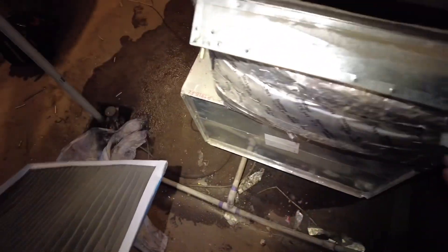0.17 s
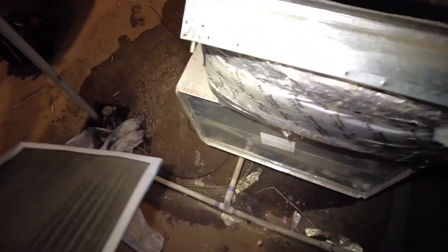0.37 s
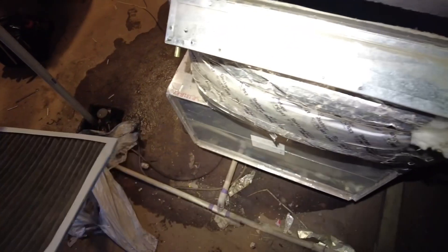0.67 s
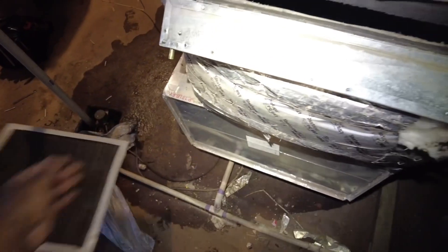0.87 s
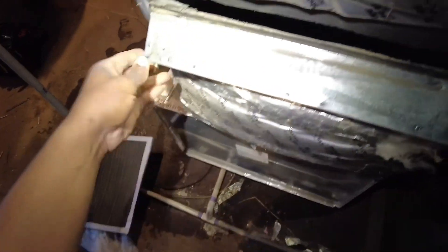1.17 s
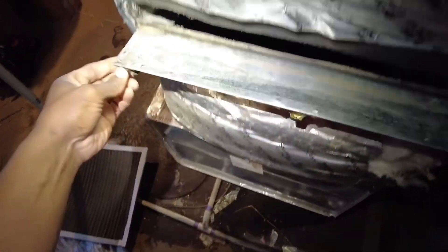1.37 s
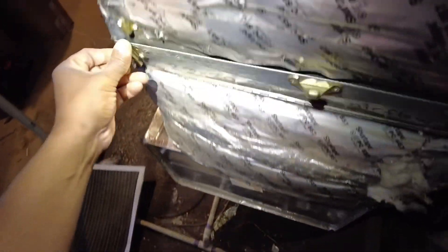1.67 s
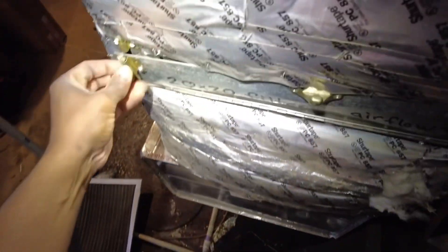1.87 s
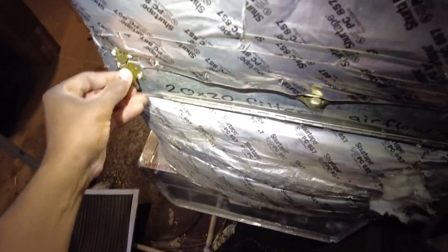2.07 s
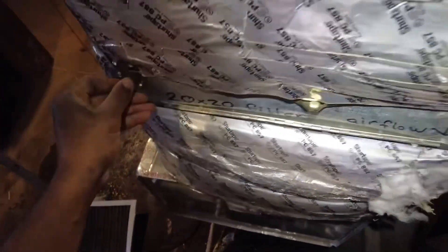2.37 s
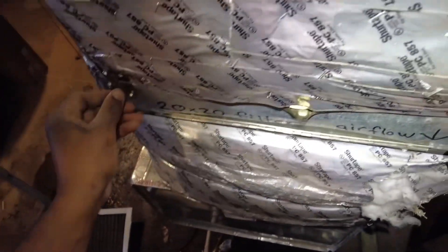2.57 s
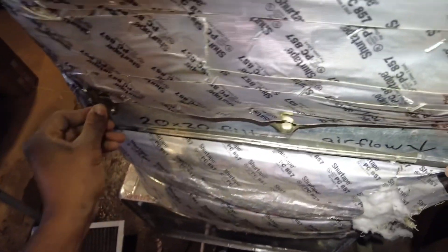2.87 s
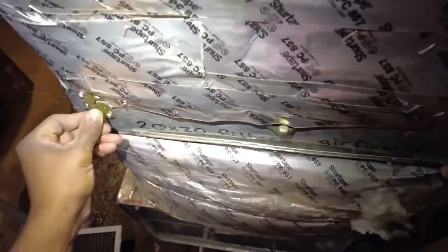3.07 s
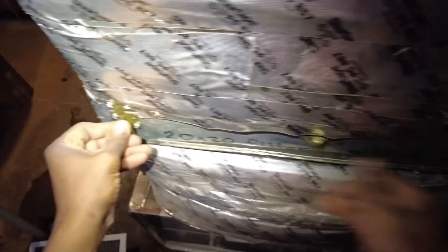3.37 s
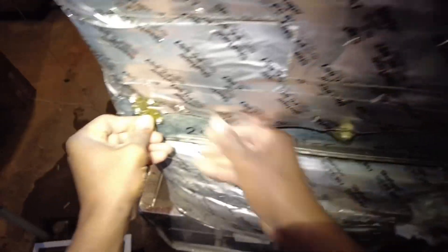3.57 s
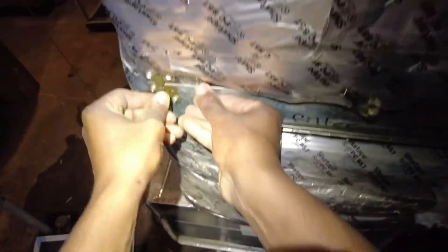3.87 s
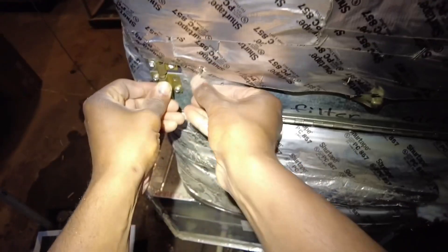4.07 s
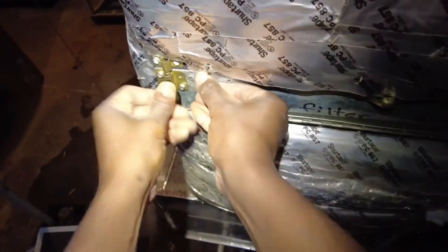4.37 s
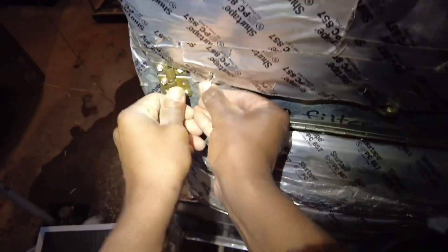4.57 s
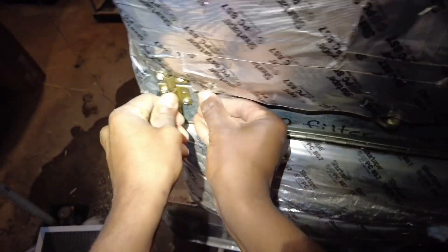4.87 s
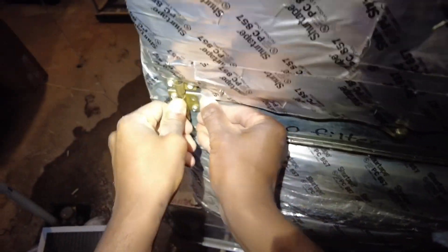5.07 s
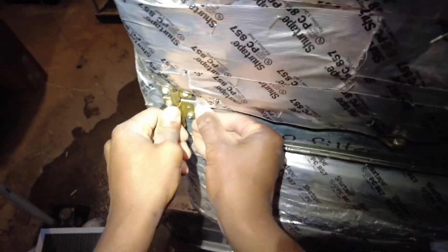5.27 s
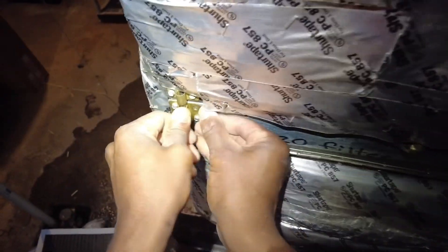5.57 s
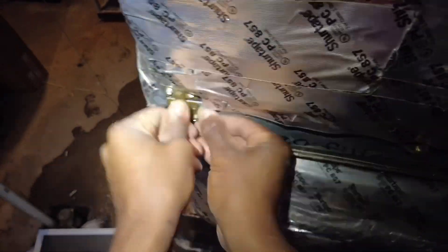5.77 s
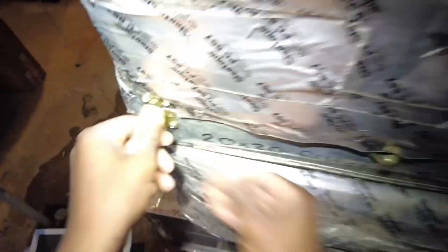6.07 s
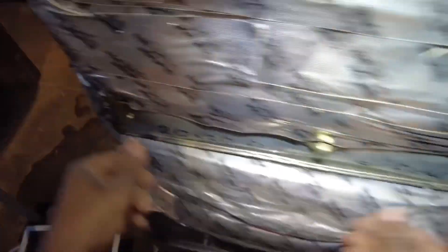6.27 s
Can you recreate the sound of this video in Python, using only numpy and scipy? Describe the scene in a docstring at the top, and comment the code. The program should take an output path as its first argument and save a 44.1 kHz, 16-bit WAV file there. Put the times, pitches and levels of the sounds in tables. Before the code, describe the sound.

An air handler's blower rumbles steadily in a small room while air rushes and faintly whines at an open filter slot. A sheet-metal cover knocks and scrapes home in three shoves, and the rush narrows to a hiss and stops. Close to the microphone, hands rub over foil tape and work a brass latch, which ticks and squeaks once. The panel thumps twice, then the latch snaps shut on a third thump.

```python
"""An air handler's blower rumbles in its ducts in a small room; air rushes and whines at the open filter slot.
A sheet-metal cover knocks against its frame and scrapes home in three shoves. The rush dies, and air
hisses through the last gap until that seals too. Hands rub over crinkling foil tape and work a brass
latch: it ticks, squeaks once and makes the panel thump twice, then snaps shut on a third thump,
leaving the foil shivering. The blower runs on."""
import sys
import numpy as np
from scipy import signal
from scipy.fft import rfft, irfft, next_fast_len
from scipy.io import wavfile
from scipy.ndimage import uniform_filter1d, map_coordinates

SR = 44100
rng = np.random.default_rng(int(sys.argv[2]) if len(sys.argv) > 2 else 0)


def digitize_waveform(pressure):
    """Quantize a signal to 16-bit integers and store it at the path in sys.argv[1].

    Rows of a 2-D input are taken as channels; values are limited to [-1, 1].
    """
    field = np.atleast_2d(pressure).T
    bounded = np.clip(field, -1, 1)
    quanta = np.round(bounded * 32767).astype(np.int16)
    wavfile.write(sys.argv[1], SR, quanta)


N = 282681
TIME = np.arange(N) / SR
HIT_TIME = np.arange(SR // 4) / SR
SLOT_SHUT_S, SLOT_FALL_DB_PER_S = 1.79, 150  # the cover passes over the open slot

# the panel giving way: start_s, peak_db, low_mode_lift_db
PANEL_THUMPS = [(4.599, -13.5, 11), (4.9339, -8.5, 1.5), (5.813, -18.5, 6.5)]
# tone colour of light contacts on tab and foil: frequency_hz, gain_db
TICK_COLOUR = [(150, -7), (500, 4.5), (1000, 2), (2700, -5), (5000, -3.5), (9000, -6.5), (16000, -17)]


def cover():
    """The sheet hisses along the foil, grates where its edge bites and knocks against the frame."""
    # pushes that drive the cover home: start_s, end_s, hiss_db, grit_db
    shoves = [(1.122, 1.185, -38, -51), (1.295, 1.35, -48, -41), (1.497, 1.592, -58, -47.5)]
    # the cover hitting its frame: start_s, level_db, hardness_db, spot_hz, spot_lift_db
    knocks = [(0.5168, -43.5, -19.5, 3140, 5), (0.5939, -41.5, -21, 1560, 15), (0.619, -44, -8.5, 6240, 7),
              (0.7961, -40, -15.5, 1590, 11), (0.8607, -36.5, -7.5, 6060, 4.5),
              (0.9383, -33.5, -7.5, 1790, 7.5), (1.1184, -31.5, -18, 3400, 12), (1.177, -29, -4, 3000, 11),
              (1.331, -37.5, -9, 1510, 7), (1.3457, -37.5, -7, 5750, 13), (1.3656, -32.5, -1, 4350, 4),
              (1.417, -37.5, 0, 6200, 3), (1.4511, -40.5, 7, 7360, 5), (1.5292, -29, -2, 1480, 6),
              (1.5342, -24.5, 1.5, 2710, 8), (1.542, -34.5, -6, 9200, 14), (1.5822, -30.5, -5, 1800, 2),
              (1.605, -37, -3, 2860, 7), (1.721, -32.5, -4, 4005, 6), (1.739, -34.5, -6, 2980, 5),
              (1.936, -44, -9, 4350, 5)]
    # tone colours of the slide, the biting edge and the knocks: frequency_hz, gain_db
    scrape_colour = [(500, -1.5), (1300, -7), (2500, -6.5), (6000, -8.5), (11000, -13), (16000, -15.5)]
    grit_colour = [(150, -6), (280, 16.5), (700, -2), (1050, -4), (1500, 4.5), (2200, -3), (3000, -3),
                   (6000, -8), (9000, -23), (16000, -35)]
    knock_colour = [(120, -26.5), (200, -1), (700, -17), (1450, -17.5), (4300, -16.5), (6300, -15.5),
                    (9060, -20), (11700, -23), (16000, -31)]
    # resonances and nulls of the sheet, and resonances of its edge: centre_hz, width_hz, gain_db
    sheet_modes = [(1070, 320, -11), (1470, 160, 9.5), (1780, 120, 4), (2240, 96, 7), (2400, 130, -4.5),
                   (2940, 250, 5.5), (4340, 480, 8), (6050, 400, 5)]
    edge_modes = [(1480, 140, 5), (2980, 380, 3), (5540, 800, 9)]

    push = lambda start, end: held(start, end, rise_db_per_s=750, fall_db_per_s=329)
    sliding = amp(-53) * push(shoves[0][0], shoves[-1][1])  # light contact from first shove to last
    hissing = sum(amp(db) * push(start, end) for start, end, db, _ in shoves)
    grating = sum(amp(db) * push(start, end) for start, end, _, db in shoves)
    judder = amp(1.2 * wobble(90) + 1.8 * wobble(600))
    friction = rush(lambda hz: along(scrape_colour, hz) + .5 * bumps(sheet_modes, hz))
    slide = np.hypot(sliding, hissing) * unit(judder * friction)
    catches = np.array([slips(per_s=500), slips(per_s=400)])
    grit = spread(catches, lambda hz: along(grit_colour, hz) + bumps(edge_modes, hz))
    ring_s = lambda db: 0.037 * 2 ** ((db + 30) / 37)  # heavier knocks shake the sheet for longer
    blows = [(s, db, hard_db, ring_s(db), spot(hz, lift_db)) for s, db, hard_db, hz, lift_db in knocks]
    # the floppy sheet seats over a few milliseconds
    clatter = contacts(blows, lambda hz: along(knock_colour, hz) + bumps(sheet_modes, hz),
                       rise_s=.0022, width=0.82, low_db=-2.5, thud=0.33)
    return slide + grating * unit(grit) + clatter


def snap():
    """The latch snaps shut with its whole body and leaves the foil shivering in a dense, noisy tail."""
    # the latch closing: start_s, level_db, hardness_db, t60_s
    closing = [(5.814, -16.5, 3.5, 0.014)]
    # tone colours of the latch and the shivering foil: frequency_hz, gain_db
    latch_colour = [(150, -17), (400, -16), (800, -24.5), (2000, -29), (4000, -20), (9000, -18),
                    (16000, -22.5)]
    foil_colour = [(150, -20), (520, 3), (950, -18.5), (1540, -12), (2200, -18), (2800, -9), (5000, -19),
                   (5950, -8), (7500, -16), (10500, -22), (16000, -25)]
    # broad resonances and nulls of the latch: centre_hz, width_hz, gain_db
    latch_modes = [(1060, 350, -4), (1560, 460, 26), (2460, 270, 8.5), (2930, 600, 12.5),
                   (4450, 1100, 12.5), (6040, 450, 10), (10600, 680, 5), (12200, 1100, 0)]
    foil_db, foil_hardness_db, foil_t60_s = -12.5, -2, 0.08  # level relative to the snap
    blows = [(s, db, hard_db, t60, []) for s, db, hard_db, t60 in closing]
    shivers = [(s, db + foil_db, foil_hardness_db, foil_t60_s, []) for s, db, _, _ in closing]
    crack = contacts(blows, lambda hz: along(latch_colour, hz) + bumps(latch_modes, hz),
                     rise_s=0.00044, width=0.72, low_db=-1.5)
    return crack + contacts(shivers, lambda hz: along(foil_colour, hz), rise_s=0.0036, width=1.0)


def panel():
    """The taped panel gives under the thumbs with a damped low thump."""
    # tone colour of a thump: frequency_hz, gain_db
    thump_colour = [(60, -33), (130, -13.5), (180, -3), (250, 2.5), (320, -6), (400, -4.5), (480, -13),
                    (570, -13.5), (730, -38.5), (1500, -41), (2500, -59), (8000, -78)]
    mode_hz, mode_width_hz = 255, 105  # the panel's lowest mode
    track = np.zeros((2, N))
    push = signal.unit_impulse(len(HIT_TIME))[None]
    for s, db, lift_db in PANEL_THUMPS:
        low_mode = [(mode_hz, mode_width_hz, lift_db)]
        thump = causal(push, lambda hz: along(thump_colour, hz) + bumps(low_mode, hz), size=8192)
        add(track, s, amp(db) * thump / np.abs(thump).max())
    return track


def latch():
    """The brass tab ticks under the fingers and rattles when the panel thumps."""
    # touches on the tab: start_s, level_db, hardness_db, spot_hz, spot_lift_db
    clicks = [(2.173, -46.5, -4, 1700, 6), (2.7848, -49.5, -9, 2885, 3), (3.0682, -35, -22, 2590, 8),
              (3.1498, -44, -25, 2660, 13), (3.175, -51, -17, 1870, 24), (3.1987, -39.5, -1.5, 7400, 4.5),
              (4.3927, -44, -7, 4160, 10), (4.4712, -41.5, 1, 3600, 5), (4.612, -44, -3, 4310, 6),
              (4.6385, -40.5, -25, 2350, 16), (4.6944, -52, 5, 10900, 16), (4.7218, -31, -9.5, 535, 4),
              (5.466, -48, -12, 2800, 6), (6.205, -46, -17, 1380, 5)]
    # resonances and nulls of the tab: centre_hz, width_hz, gain_db
    tab_modes = [(800, 260, -8.5), (1230, 230, 2), (1660, 270, 4), (2160, 680, -3), (2830, 350, 7.5),
                 (3630, 300, 0), (10600, 900, 1)]
    rattle_db, rattle_hardness_db, rattle_t60_s = -30, -10, 0.08  # level relative to the thump
    ring_s = lambda hard_db: 0.037 * 2 ** (hard_db / 8)  # a finger dulls and damps the tab together
    ticks = [(s, db, hard_db, ring_s(hard_db), spot(hz, lift_db))
             for s, db, hard_db, hz, lift_db in clicks]
    rattles = [(s, db + rattle_db, rattle_hardness_db, rattle_t60_s, []) for s, db, _ in PANEL_THUMPS]
    return contacts(ticks + rattles, lambda hz: along(TICK_COLOUR, hz) + bumps(tab_modes, hz),
                    rise_s=0.00056, width=0.68, thud=0.55)


def squeak():
    """The brass tab slips once with a falling stick-slip tone; overtones and rasp grow with pressure."""
    # harmonics at full pressure, from the fundamental up: gain_db
    harmonics = [2, -7, -20, -22]
    start_s, end_s = 4.453, 4.465
    pitch_hz, sag_hz_per_s, jitter_share = 3620, 9000, .026
    glide_hz = np.clip(pitch_hz - sag_hz_per_s * (TIME - start_s), pitch_hz / 2, 2 * pitch_hz)
    phase = 2 * np.pi * np.cumsum(glide_hz * (1 + jitter_share * wobble(2500))) / SR
    pressure = held(start_s, end_s, rise_db_per_s=1600, fall_db_per_s=3000)
    tone = sum(amp(db) * pressure ** np.sqrt(k) * np.sin(k * phase) for k, db in enumerate(harmonics, 1))
    chatter = amp(2.1 * wobble(900))
    rasp = amp(-5.5) * pressure ** 2 * rush(lambda hz: along(TICK_COLOUR, hz))
    return amp(-37.5) * chatter * (np.sqrt(2) * tone + rasp)


def hands():
    """Hands rub over foil tape and latch; each stroke swells and fades with a fine grain."""
    # strokes: start_s, length_s, level_db
    rubs = [(2.036, 0.5, -67.5), (2.956, 0.11, -65), (3.555, 0.33, -59.5), (4.23, 0.16, -63.5),
            (4.923, 0.093, -57.5), (5.778, 0.067, -48)]
    # tone colour of the rubbing: frequency_hz, gain_db
    rub_colour = [(600, -9), (1400, -0.5), (4300, -3), (8000, -4.5), (13000, -12), (16000, -17)]
    strokes = sum(amp(db) * np.sin(np.pi * np.clip((TIME - s) / length, 0, 1)) for s, length, db in rubs)
    grain = amp(wobble(40) + 2 * wobble(400))
    return strokes * unit(grain * rush(lambda hz: along(rub_colour, hz)))


def crinkles():
    """The foil tape gives faint ticks at random while the fingers feel for the latch."""
    start_s, length_s, ticks_per_s = 2.25, 0.55, 7
    loudest_db, hardness_db, t60_s = -54, -8, .018
    draws = rng.random((round(length_s * ticks_per_s), 3))
    ticks = [(start_s + when * length_s, loudest_db - 5 * weak, hardness_db, t60_s,
              spot(hz=1500 * 4 ** pitch, lift_db=10)) for when, weak, pitch in draws]
    return contacts(ticks, lambda hz: along(TICK_COLOUR, hz), rise_s=0.00039, width=1.0)


def suction():
    """Air rushes into the open slot, then hisses higher through the last gap until that seals."""
    # tone colour of the flow into the open slot: frequency_hz, gain_db
    slot_colour = [(160, -53), (280, -14), (326, -4), (361, -32), (393, -20), (465, 2), (664, -6.5),
                   (800, -12), (980, -11), (1740, -13.5), (3860, -24.5), (4350, -22), (16000, -42.5)]
    # resonances of the open slot: centre_hz, width_hz, gain_db
    slot_modes = [(710, 100, -4), (874, 170, 6.5), (1288, 45, 9.5), (1650, 450, 4.5), (3200, 300, 5),
                  (4220, 420, 7)]
    # resonances of the last narrow gap: centre_hz, half_width_hz, gain_db
    gap_modes = [(1340, 90, -1), (1820, 200, 6.5), (2940, 200, 6), (4170, 260, -3)]
    sealed_s = 1.92
    slot = rush(lambda hz: along(slot_colour, hz) + bumps(slot_modes, hz))
    gap_gain = lambda hz: sum(amp(db) / (1 + ((hz - centre) / half_width) ** 2)
                              for centre, half_width, db in gap_modes)
    gap = rush(lambda hz: 20 * np.log10(gap_gain(hz)))
    wide_open = amp(-51.5) * held(0, SLOT_SHUT_S, 0, SLOT_FALL_DB_PER_S)
    narrowing = amp(-49.5) * held(SLOT_SHUT_S, sealed_s, rise_db_per_s=100, fall_db_per_s=120)
    unrest = amp(.8 * wobble(11.67))
    return unrest * (wide_open * slot + narrowing * gap)


def whine():
    """The blower's wavering tones escape while the slot is open."""
    # blower tones: pitch_hz, level_db
    partials = [(465, -64), (803, -65)]
    waver_hz, flutter_db = 6.5, 4
    tone = lambda hz: np.sin(2 * np.pi * np.cumsum(hz + waver_hz * wobble(30.02)) / SR)
    tones = sum(amp(db) * unit(amp(flutter_db * wobble(12.04)) * tone(hz)) for hz, db in partials)
    return tones * held(0, SLOT_SHUT_S, 0, SLOT_FALL_DB_PER_S)


def blower():
    """Fan turbulence booms in the ducts' standing waves, under a soft hiss of flow."""
    # tone colours of the duct rumble and the flow in the closed cabinet: frequency_hz, gain_db
    rumble_colour = [(18, -7), (43, -3.5), (65, -7.5), (102, 1), (120, -5.5), (140, -12), (156, -17.5),
                     (190, -9), (232, -13), (271, -24), (336, -23), (403, -30), (435, -24), (700, -41.5),
                     (1540, -120)]
    flow_colour = [(410, -11), (700, -6), (757, -8.5), (1080, -16), (1820, -13.5), (2370, -15),
                   (3110, -19.5), (5190, -23), (7990, -29), (9110, -26), (9860, -32.5), (16000, -36)]
    # standing waves and nulls of the ducts and the cabinet: centre_hz, width_hz, gain_db
    duct_modes = [(57.3, 12.7, 5.5), (69, 26.8, -8.5), (94.4, 21.6, 3.5), (174, 16, 2), (192, 11, 2.5),
                  (226.7, 15, 5), (465, 22, 2.5)]
    cabinet_modes = [(1284, 180, 6.5), (2210, 500, -4.5), (3040, 430, 3.5)]
    # a null near the cabinet that hollows the hiss: centre_hz, width_hz, gain_db
    null = [(1090, 350, -9)]
    # how deeply it does so: time_s, share (0-1)
    hollowing = [(1.75, 0.9), (1.95, 1), (2.55, 0.44), (3.0, 0.08), (5.8, 0), (6.1, 0)]
    rumble = rush(lambda hz: along(rumble_colour, hz) + bumps(duct_modes, hz))
    escape_db = np.interp(TIME, [.6, 2.2, 6.4], [-30.3, -33.3, -32])  # the shut cover holds some rumble in
    hiss = rush(lambda hz: along(flow_colour, hz) + bumps(cabinet_modes, hz))
    machine = amp(escape_db + 0.72 * wobble(4.23)) * rumble + amp(-58.5 + 0.12 * wobble(2.77)) * hiss
    hollow = filtered(machine, lambda hz: amp(bumps(null, hz)))
    share = np.clip(np.interp(TIME, *np.transpose(hollowing)), 0, 1)
    return (1 - share) * machine + share * hollow


def drifting(x):
    """Narrow peaks and dips above the bass come and go as the listener moves through standing waves."""
    hz, _, spectrum = signal.stft(x, SR, nperseg=1024)
    field = uniform_filter1d(rng.standard_normal(spectrum.shape[1:]), size=5, axis=0)  # smooth in pitch
    field = uniform_filter1d(field, size=40, axis=1)  # and in time
    depth_db = 1.6 * along([(250, 0), (600, 1), (4000, 1), (12000, .5)], hz)[:, None]
    return signal.istft(spectrum * amp(depth_db * unit(field)), SR, nperseg=1024)[1][:, :N]


def room(x):
    """The small room adds a short diffuse tail that differs between left and right above the bass."""
    # reverberation time: frequency_hz, t60_s
    decay_times = [(150, 0.2), (1000, 0.14), (4000, 0.17), (9000, 0.17), (16000, 0.12)]
    hz, t, noise = signal.stft(rng.standard_normal((2, SR // 2)), SR, nperseg=256)
    decay = amp(-60 * t / along(decay_times, hz)[:, None])
    onset = 1 - np.exp(-t / 0.0014)
    reflections = signal.istft(noise * decay * onset, SR, nperseg=256)[1]
    tail = spread(reflections, np.zeros_like)[:, :SR // 2]
    return signal.fftconvolve(x, tail / np.linalg.norm(tail[0]), axes=1)[:, :N]


def contacts(hits, colour_db, rise_s, width, low_db=0, thud=0):
    """Cracks ring the part and the spot struck; hardness lifts the treble, thud gives soft hits bass."""
    track = np.zeros((2, N))
    for s, db, hard_db, t60_s, resonances in hits:
        mid, side = burst(np.clip(t60_s, .004, .12), rise_s)
        crack = np.array([mid + width * side, mid - width * side])
        tilt = [(700, low_db - thud * hard_db), (1400, 0.0058), (3500, 0), (10000, hard_db)]
        hit = causal(crack, lambda hz: colour_db(hz) + along(tilt, hz) + bumps(resonances, hz))
        peak_power = uniform_filter1d(np.mean(hit ** 2, axis=0), size=128).max()
        add(track, s, amp(db) * hit / np.sqrt(peak_power))
    return track


def spot(hz, lift_db):
    """The resonance that one point of contact favours; higher ones are wider and die faster."""
    return [(hz, .16 * hz, lift_db)]


def burst(t60_s, rise_s):
    """Two noise bursts that build and die, with their energy spread evenly over frequency."""
    envelope = (1 - np.exp(-HIT_TIME / rise_s)) * amp(-60 * HIT_TIME / t60_s)
    spectrum = rfft(rng.standard_normal((2, len(HIT_TIME))) * envelope)
    even = spectrum / np.sqrt(uniform_filter1d(np.abs(spectrum) ** 2, size=90, axis=1))
    return irfft(even, len(HIT_TIME)) * (HIT_TIME < 2 * t60_s)


def slips(per_s):
    """Tiny stick-slip impulses of uneven size at random moments."""
    return (rng.random(N) < per_s / SR) * rng.standard_normal(N)


def rush(curve_db):
    """Stereo noise of rms 1 with a dB colour."""
    return unit(spread(rng.standard_normal((2, N)), curve_db))


def spread(pair, curve_db):
    """Two unrelated signals become left and right, coloured and near mono in the bass."""
    # how alike left and right are: frequency_hz, correlation
    likeness = [(60, 0.97), (130, 0.99), (290, 0.89), (640, 0.2), (1410, 0.69), (3100, 0.3), (6820, 0.12),
                (15000, 0.18)]
    angle = lambda hz: np.arccos(np.clip(along(likeness, hz), -1, 1)) / 2
    mid, side = filtered(pair, lambda hz: amp(curve_db(hz)) * [np.cos(angle(hz)), np.sin(angle(hz))])
    return np.array([mid + side, mid - side])


def held(start_s, end_s, rise_db_per_s, fall_db_per_s):
    """Envelope that reaches 1 at start_s, holds until end_s and dies away."""
    return amp(-rise_db_per_s * np.maximum(start_s - TIME, 0) - fall_db_per_s * np.maximum(TIME - end_s, 0))


def wobble(knots_per_s):
    """A smooth random curve."""
    return map_coordinates(rng.standard_normal(int(N * knots_per_s / SR) + 4), [TIME * knots_per_s])


def filtered(x, response):
    """x through a zero-phase filter whose gain is a function of frequency."""
    size = next_fast_len(N + SR // 2)
    return irfft(rfft(x, size) * response(np.fft.rfftfreq(size, 1 / SR)), size)[..., :N]


def causal(x, curve_db, size=2048):
    """x through the minimum-phase filter of a dB curve, so nothing rings ahead of a hit."""
    cepstrum = irfft(np.log(amp(curve_db(np.fft.rfftfreq(size, 1 / SR))) + 1e-6))
    cepstrum[1:size // 2] *= 2
    cepstrum[size // 2 + 1:] = 0
    impulse_response = irfft(np.exp(rfft(cepstrum)))
    return signal.fftconvolve(x, impulse_response[None], axes=1)[:, :x.shape[1]]


def bumps(modes, hz):
    """dB curve of a set of resonances and nulls."""
    return sum(db / (1 + (2 * (hz - centre) / width) ** 2) for centre, width, db in modes)


def along(points, hz):
    """(frequency_hz, value) points read on a log axis."""
    knots_hz, values = np.transpose(points)
    return np.interp(np.log(hz + 1), np.log(knots_hz + 1), values)


def add(track, start_s, sound):
    """Mix a sound into a track."""
    part = track[:, round(start_s * SR):][:, :sound.shape[-1]]
    part += sound[..., :part.shape[1]]


def amp(db):
    """Decibels to gain."""
    return 10 ** (np.asarray(db) / 20)


def unit(x):
    """x at rms 1."""
    return x / np.sqrt(np.mean(x ** 2) + 1e-20)


def scene():
    """Close handling of cover and latch, with a little room, over the running machine."""
    sheet, brass, shut, thumps = cover(), latch() + squeak(), snap(), panel()
    reverb = room(amp(-9) * (sheet + brass) + amp(-10.5) * shut + amp(-8) * thumps)
    air = drifting(blower() + suction())
    mix = air + whine() + hands() + crinkles() + sheet + brass + shut + thumps + reverb
    return mix * amp([[-.25], [.25]])  # leans slightly right


def record(dry):
    """The very top of the treble is cut off steeply."""
    top_hz, slope_width_hz = 16100, 600
    return filtered(dry, lambda hz: np.clip((top_hz - hz) / slope_width_hz + .5, 0, 1) ** 2)


dry = scene()
out = record(dry)
digitize_waveform(out)
```